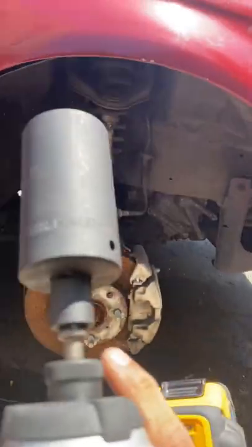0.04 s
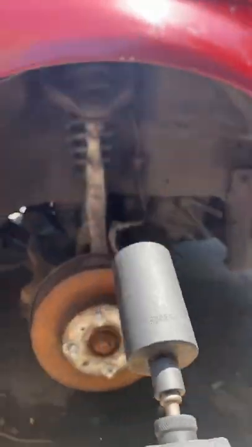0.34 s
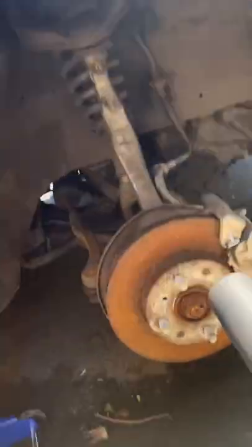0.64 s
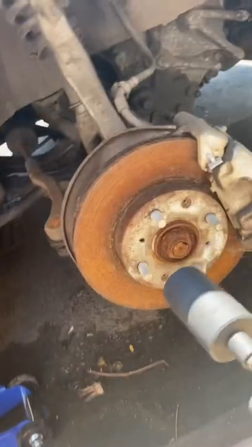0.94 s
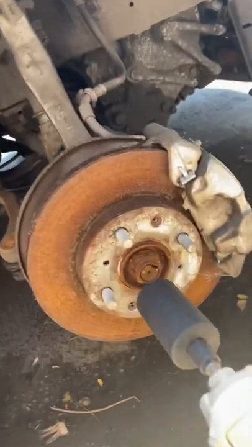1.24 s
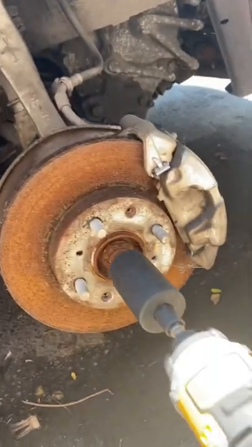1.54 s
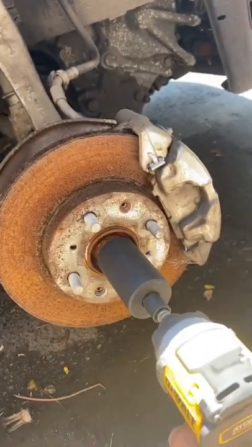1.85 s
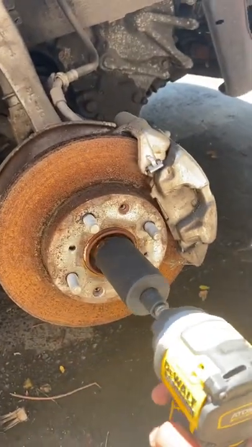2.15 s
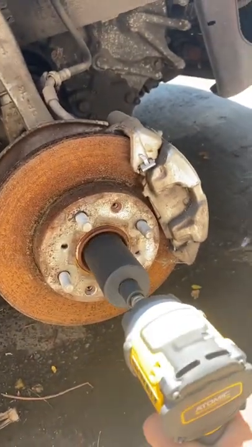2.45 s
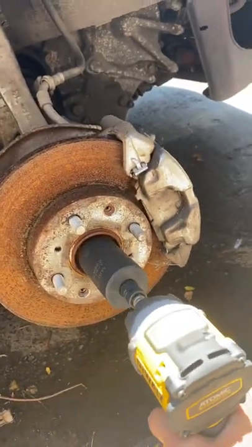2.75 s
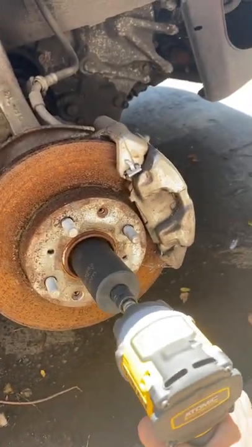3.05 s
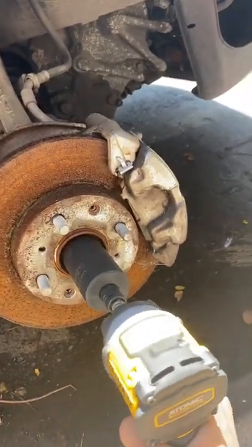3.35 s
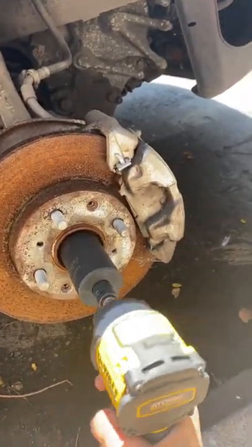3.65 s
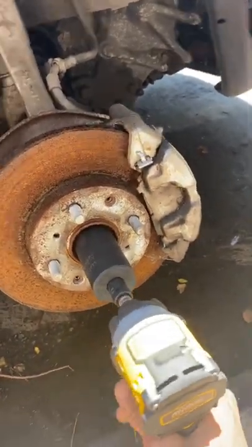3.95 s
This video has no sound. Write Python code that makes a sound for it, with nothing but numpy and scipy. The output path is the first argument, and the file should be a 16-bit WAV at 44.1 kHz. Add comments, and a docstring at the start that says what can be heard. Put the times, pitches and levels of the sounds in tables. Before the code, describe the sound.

Steel socket clinking and clunking onto a car's axle nut, over low outdoor rumble.

```python
"""Outdoors at a car's wheel, a deep steel socket on a cordless driver is fitted onto the axle nut.
It knocks and clinks on the nut, squeals and grinds over the flats by friction, seats with a clunk
and clicks in its play. Impacts excite the damped modes of hub and brake disc, and the socket wall
sings high. Low rumble and light wind lie beneath, and all reaches the two ports of a nearby phone."""
import sys
import numpy as np
from scipy import signal
from scipy.fft import rfft, irfft
from scipy.io import wavfile

SR = 44100
rng = np.random.default_rng(int(sys.argv[2]) if len(sys.argv) > 2 else 0)


def transcribe(signal):
    """Save signal, clipped to [-1, 1], as a 16-bit WAV file at the path in sys.argv[1]."""
    frames = np.atleast_2d(signal).T
    limited = np.clip(frames, -1, 1)
    pcm = np.round(limited * 32767).astype(np.int16)
    wavfile.write(sys.argv[1], SR, pcm)


N = 176400

# Bass, mid, treble and top bands: low_hz, high_hz
BAND_EDGES = [(250, 1400), (1400, 2500), (2500, 4500), (4500, 17000)]
# Blows of the socket on the nut: start_s, bass_db, mid_db, treble_db, top_db, contact_hz
NUT_KNOCKS = [(1.561, -21.5, -23, -32, -41.5, 877), (1.569, -18, -17, -16, -26, 2750),
              (1.631, -39, -55.5, -50, -53.5, 2640), (1.972, -30.5, -38.5, -44, -49, 900),
              (2.031, -25.5, -22, -15, -12.5, 4720), (2.048, -22.5, -18.5, -12.5, -21, 4210),
              (2.072, -25, -20.5, -16, -17, 4830), (2.093, -22, -24.5, -19.5, -25, 1426),
              (2.127, -28.5, -26.5, -20, -17.5, 5180), (2.161, -33, -29, -30, -29.5, 9800),
              (2.181, -38, -38, -41, -41.5, 2710), (2.215, -31.5, -28.5, -29, -44.5, 2530),
              (2.529, -14.5, -15.5, -15.5, -20, 1142), (2.544, -27, -24.5, -17.5, -34.5, 2150),
              (2.570, -27, -29.5, -27.5, -29, 5700), (2.631, -32, -34, -41.5, -42.5, 1840),
              (3.253, -43.5, -42, -42.5, -50, 2145), (3.431, -26.5, -29, -24.5, -45, 558),
              (3.65, -44, -39.5, -42, -52, 1435)]
# Clicks in the play of the drive: start_s, bass_db, mid_db, treble_db, top_db
DRIVE_CLICKS = [(1.94, -52, -51, -54, -52.5), (1.999, -58, -48.5, -36, -46.5),
                (2.0192, -39, -25.5, -18, -20.5), (2.428, -57, -46, -46.5, -52),
                (2.495, -34, -24, -17, -12), (2.68, -41, -44.5, -53, -53), (2.885, -40, -29, -29, -31.5),
                (2.975, -47.5, -33.5, -29, -28.5), (3.16, -40, -31.5, -30, -30),
                (3.172, -40, -33, -26, -25.5), (3.608, -50, -42, -38.5, -47.5),
                (3.623, -57, -42, -42, -42.5), (3.795, -51, -56, -54, -52.5)]
# The socket sliding under pressure: start_s, length_s, bass_db, mid_db, treble_db, top_db
SOCKET_SLIDES = [(1.820, 0.15, -60, -63.5, -66, -62), (2.031, .05, -34, -24, -20, -21),
                 (2.091, 0.026, -60, -25, -32, -28.5), (2.501, 0.038, -30.5, -22.5, -21.5, -34),
                 (2.530, 0.03, -27.5, -26.5, -36.5, -29.5), (2.885, 0.111, -46, -45, -44, -55),
                 (3.606, 0.067, -46.5, -53, -53.5, -63)]
# Narrow-band clinks, rubbing tones and squeals: start_s, length_s, pitch_hz, width_hz, level_db
METAL_TONES = [(1.564, 0.014, 9250, 790, -29.5), (1.670, 0.12, 4440, 70, -64),
               (2.888, 0.11, 2003, 238, -36.5), (3.379, 0.066, 8960, 595, -58.5),
               (3.429, 0.00647, 3520, 794, -25.5)]
# Blows that leave the socket free to sing until the hand damps it: start_s, gain_db, free_s
FREE_RINGS = [(2.092, -18.5, 0.053), (2.532, -32, 0.022), (2.555, -26.5, 0.025)]
# Close modes of the socket wall: pitch_hz, gain_db
WALL_MODES = [(8868, 6), (8925, -7.5)]
# Spectral envelope of the hub's dense modes: frequency_hz, gain_db
HUB_SPECTRUM = [(250, -16), (440, -2.5), (600, -4.5), (1050, 5), (1250, -10.5), (1420, 7), (1680, -3),
                (1950, 6.5), (2350, -3), (2800, -1.5), (3700, 0), (4400, -12), (5200, -7), (6500, -12.5),
                (9300, -12), (11000, -16), (15500, -22), (17000, -46)]
# Their decay times: frequency_hz, t60_s
HUB_DECAY = [(300, 0.2), (1000, 0.11), (2700, 0.12), (5000, 0.066), (15000, 0.081)]
# Distinct modes of brake disc and hub: pitch_hz, gain_db, t60_s
DISC_MODES = [(441.4, 1, 0.26), (734, -10.5, 0.11), (1080, -8, 0.18), (1202, -6, 0.25), (1584, -5.5, 0.47),
              (1907, 2.5, 0.38), (2190, -7, .13), (2290, -12, 0.37), (2545, -2.5, 0.12), (2700, -7, .19),
              (2664, -14, .18), (3150, 7.5, 0.047), (3250, -12, .14), (3836, -5, 0.11), (5120, -14, .13),
              (5220, -27.5, .12), (5370, -10.5, 0.11)]
# Outdoor rumble: frequency_hz, relative_density_db
RUMBLE_SPECTRUM = [(20, -32), (40, -20), (62, -8), (90, -2.5), (135, -0.5), (170, -8.5), (215, -4),
                   (320, -8.5), (520, -14), (720, -13), (1000, -19.5), (1500, -23.5), (2500, -31.5),
                   (4000, -33.5), (7000, -46), (10000, -54.5), (13000, -65), (16000, -61.5)]
# Faint steady whines: pitch_hz, width_hz, level_db
WHINE_BANDS = [(1980, 23, -64), (4426, 150, -78.5)]
# Wind on the microphone: frequency_hz, relative_density_db
WIND_SPECTRUM = [(20, -97), (35, -11), (52, 1.5), (66, 0), (90, -8.5), (150, -8.5), (300, -26),
                 (800, -58.5)]
# Course of the gusts: time_s, level_db
GUST_LEVELS = [(0, -40.5), (.4, -41), (.6, -41.5), (1.4, -43.5), (1.752, -32), (2.1, -41.5), (2.25, -46.5),
               (2.4, -34.5), (2.999, -39.5), (3.3, -36), (3.7, -32.5), (3.92, -27.5), (4, -32.5)]
# Phase between the microphone ports: frequency_hz, left_lead_rad
PORT_LEAD = [(100, 0), (300, -.2), (500, -.9), (750, -2.2), (1100, -2.3), (1400, -3.6), (1900, -5.3),
             (3000, -4.9), (4400, -5.2), (5100, -5.9), (6000, -4.7), (7300, -3.14), (8900, -1.5),
             (10400, 0), (11500, .7), (13400, 3.14), (15000, 4.7), (16000, 6.3)]
# Balance of the ports: frequency_hz, left_minus_right_db
PORT_BALANCE = [(130, 0.5), (300, -1.5), (550, 0), (760, -5), (1050, -2.5), (3000, -0.5), (5200, -0.5),
                (8000, 0)]
# Scattered sound relative to direct sound: frequency_hz, ratio_db
PORT_SCATTER = [(50, -29.5), (125, -24), (250, -20.5), (500, -6.5), (900, -2.5), (1400, -2.5), (2000, -10),
                (3500, 7.5), (4700, -3), (6000, -17), (7300, -56), (12000, -3), (15000, -18.5)]

RING_SAMPLES, BLOW_S, CLICK_FADE_S = 20000, 0.0053, 0.023
CONTACT_DB, CONTACT_WIDTH_SHARE, CONTACT_RING_DB, CONTACT_T60_RATIO = 4.5, 0.4, -7.5, 1.21
DISC_DB, RISE_S = 0.5, 0.00033
CRACK_DB, CRACK_FADE_S, CRACK_HISS_DB = 4.5, 0.00072, -30.5
GRIT_PER_S, GRIT_SPREAD_DB = 600, 2
SING_T60_S, DAMPED_T60_S, AFTER_DB, AFTER_T60_S = 0.4, 0.081, -27.5, 0.37
SING_WAVER_DB, SING_WANDER_HZ, SING_WAVER_PER_S = 3.5, 35, 140
RUMBLE_DB, BUFFET_DB, BUFFET_PER_S = -42.5, 2.5, 16
CUTOFF_HZ = 16100


def knocks():
    """Impact excitation: each blow rings the hub, most strongly near its contact resonance."""
    out, t = np.zeros((2, N)), np.arange(RING_SAMPLES) / SR
    for (start, *band_db, hz), ring in zip(NUT_KNOCKS, hub_rings(len(NUT_KNOCKS))):
        t60 = CONTACT_T60_RATIO * at(HUB_DECAY, hz)
        phase = rng.uniform(0, 2 * np.pi, (2, 1))
        favoured_mode = np.sin(2 * np.pi * hz * t + phase) * undb(CONTACT_RING_DB - 60 * t / t60)
        contact = undb(CONTACT_DB) * resonate(ring, hz, CONTACT_WIDTH_SHARE * hz)
        add(out, set_bands(ring + favoured_mode + contact, band_db, BLOW_S), start)
    return out


def hub_rings(count):
    """Modal superposition: a crack, then the same damped modes, phased anew for each contact."""
    t = np.arange(RING_SAMPLES) / SR
    low, high, modes = BAND_EDGES[0][0], BAND_EDGES[-1][-1], 220
    dense_hz = low * (high / low) ** ((np.arange(modes) + rng.random(modes)) / modes)
    disc_hz, disc_db, disc_t60 = np.array(DISC_MODES).T
    hz = np.r_[dense_hz, disc_hz]
    t60 = np.r_[at(HUB_DECAY, dense_hz), disc_t60]
    gain = undb(np.r_[at(HUB_SPECTRUM, dense_hz), disc_db + DISC_DB])
    angle = 2 * np.pi * np.outer(hz, t)
    decay = undb(-60 * t / t60[:, None])
    phase = rng.uniform(0, 2 * np.pi, (2 * count, len(hz)))
    rings = (gain * np.cos(phase)) @ (decay * np.sin(angle))
    rings += (gain * np.sin(phase)) @ (decay * np.cos(angle))
    rings = rings.reshape(count, 2, -1) / np.sqrt(np.sum(gain ** 2) / 2)
    hiss = rng.standard_normal(rings.shape)
    dull = signal.sosfilt(signal.butter(1, 5000, fs=SR, output="sos"), hiss)
    crack = undb(CRACK_DB) * (dull + undb(CRACK_HISS_DB) * hiss) * np.exp(-t / CRACK_FADE_S)
    return rings * (1 - np.exp(-t / RISE_S)) + crack


def clicks():
    """Backlash: the socket strikes across the play of its drive, and the hand damps the ring at once."""
    out, t = np.zeros((2, N)), np.arange(RING_SAMPLES) / SR
    damping = np.exp(-t / CLICK_FADE_S)
    for (start, *band_db), ring in zip(DRIVE_CLICKS, hub_rings(len(DRIVE_CLICKS))):
        add(out, set_bands(ring * damping, band_db, BLOW_S), start)
    return out


def slides():
    """Stick-slip friction: pulses, convolved with the hub's impulse response, make it grind."""
    out = np.zeros((2, N))
    for (start, length, *band_db), ring in zip(SOCKET_SLIDES, hub_rings(len(SOCKET_SLIDES))):
        grinding = signal.fftconvolve(ring, grit(length)[None], axes=1)
        add(out, set_bands(grinding, band_db, length), start)
    return out


def metal_tones():
    """Narrow-band resonance: brief bright clinks of knocks, and longer rubbing tones and squeals."""
    out = np.zeros((2, N))
    for start, length, hz, width, db in METAL_TONES:
        pulses = np.array([grit(length), grit(length)])
        tone = resonate(resonate(pulses, hz, width), hz, 2 * width)
        add(out, level(tone, db), start)
    return out


def grit(length_s):
    """Impulsive excitation: contact of steel on steel as pulses of random timing and strength."""
    size = int(length_s * SR)
    chance = rng.random(RING_SAMPLES)[:size]
    strength = rng.standard_normal(RING_SAMPLES)[:size]
    pulses = chance <= np.quantile(chance, GRIT_PER_S / SR)
    force = np.sign(strength) * undb(GRIT_SPREAD_DB * np.abs(strength))
    return pulses * force * signal.windows.tukey(size, .2)


def socket_song():
    """Free vibration: wall modes beat and waver with rubbing until damping leaves a faint after-ring."""
    out, t = np.zeros((2, N)), np.arange(RING_SAMPLES) / SR
    attack = 1 - np.exp(-t / .001)
    for start, db, free_s in FREE_RINGS:
        decay = undb(-60 * (t / SING_T60_S + np.maximum(t - free_s, 0) / DAMPED_T60_S))
        after_ring = undb(AFTER_DB - 60 * t / AFTER_T60_S)
        rub_phase = 2 * np.pi * np.cumsum(SING_WANDER_HZ * waver(SING_WAVER_PER_S, RING_SAMPLES)) / SR
        gain = undb(db + SING_WAVER_DB * waver(SING_WAVER_PER_S, RING_SAMPLES))
        tone = sum(undb(mode_db) * np.sin(2 * np.pi * hz * t + rub_phase) for hz, mode_db in WALL_MODES)
        song = gain * tone * attack * (decay + after_ring)
        add(out, np.outer([1, 0], song), start)  # direct sound only
    return out


def outdoors():
    """Broadband and narrowband noise: distant rumble, faint whines and wind modulated by gusts."""
    gust_db = np.interp(np.arange(N) / SR, *np.array(GUST_LEVELS).T)
    gust_db += BUFFET_DB * waver(BUFFET_PER_S, N)
    whines = 0
    for hz, width, db in WHINE_BANDS:
        hiss = rng.standard_normal((2, N))
        whines += level(resonate(resonate(hiss, hz, width), hz, width), db)
    rumble = level(noise(RUMBLE_SPECTRUM), RUMBLE_DB)
    wind = level(noise(WIND_SPECTRUM), 0) * undb(gust_db)
    return rumble + whines + wind


def ports(pair):
    """Interference: scattered sound adds at one port and subtracts at the other, which lags or leads."""
    hz, side = np.fft.rfftfreq(N, 1 / SR), np.array([[1], [-1]])
    share = undb(at(PORT_SCATTER, hz))
    direct, scattered = rfft(pair)
    left_right = (direct + side * share * scattered) / np.hypot(1, share)
    balance = undb(side * at(PORT_BALANCE, hz) / 2)
    phase_shift = np.exp(.5j * side * at(PORT_LEAD, hz))
    return irfft(left_right * balance * phase_shift, N)


def set_bands(x, band_db, span_s):
    """Filter bank: each band is scaled to its rms level over the first span_s."""
    out = 0
    for edges, db in zip(BAND_EDGES, band_db):
        band = signal.sosfilt(signal.butter(3, edges, "band", fs=SR, output="sos"), x)
        out += band * undb(db) / np.sqrt(np.mean(band[:, :int(span_s * SR)] ** 2))
    return out


def resonate(x, hz, width_hz):
    """Second-order resonance of quality factor hz / width_hz."""
    return signal.lfilter(*signal.iirpeak(hz, hz / width_hz, fs=SR), x)


def noise(spectrum):
    """Spectral shaping: two uncorrelated noises of one colour."""
    gain = undb(at(spectrum, np.fft.rfftfreq(N, 1 / SR)))
    return irfft(rfft(rng.standard_normal((2, N))) * gain, N)


def waver(per_s, size):
    """Random modulation: interpolated noise with a spread near 1."""
    return np.interp(np.arange(size) / SR * per_s, np.arange(size), rng.standard_normal(size))


def undb(db):
    """Decibels to amplitude ratio."""
    return 10 ** (np.asarray(db) / 20)


def at(table, hz):
    """Interpolation on a log-frequency axis."""
    table_hz, values = np.array(table, float).T
    return np.interp(np.log(np.maximum(hz, 1)), np.log(table_hz), values)


def level(x, db):
    """Normalisation to an rms level."""
    return x * undb(db) / np.sqrt(np.mean(x ** 2) + 1e-20)


def add(out, x, start_s):
    """Superposition of x on out from start_s."""
    i = int(start_s * SR)
    out[:, i:i + x.shape[1]] += x[:, :N - i]


def scene():
    """Linear superposition: the sources sum in a direct and a scattered row, heard at the two ports."""
    return ports(outdoors() + knocks() + clicks() + slides() + metal_tones() + socket_song())


def record(dry):
    """Band limiting: the phone's steep low-pass filter removes the highest treble."""
    return signal.sosfilt(signal.ellip(10, .2, 80, CUTOFF_HZ, fs=SR, output="sos"), dry)


dry = scene()
out = record(dry)
transcribe(out)
```